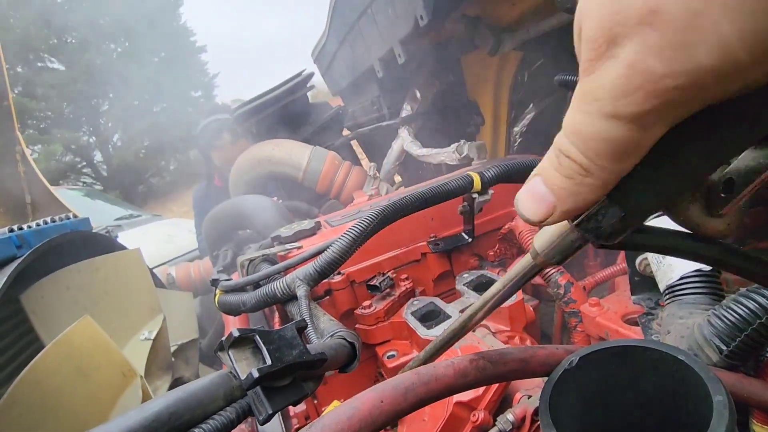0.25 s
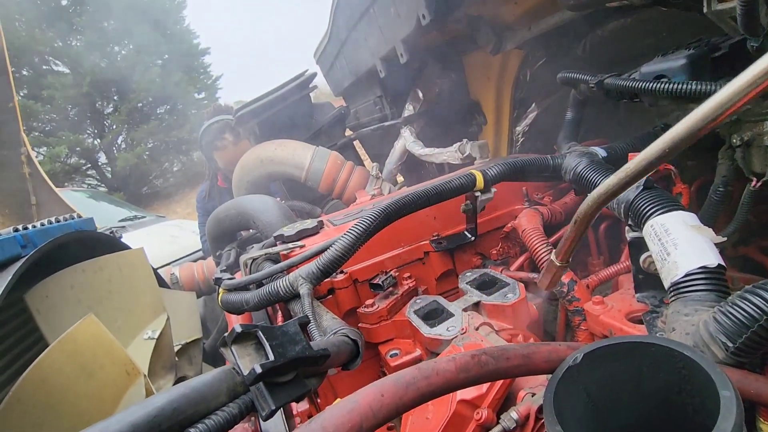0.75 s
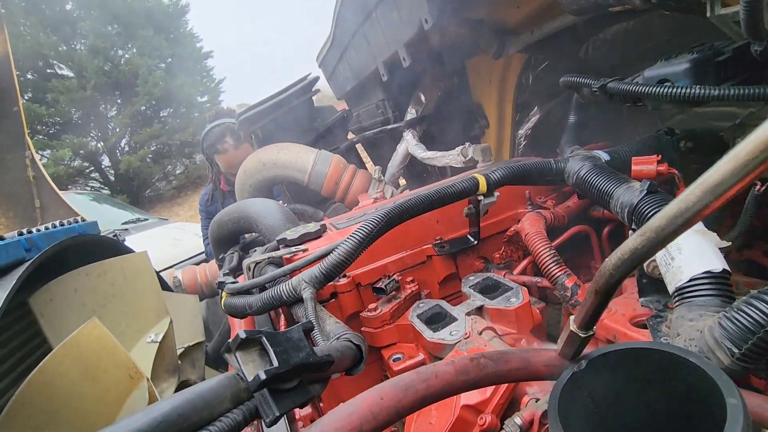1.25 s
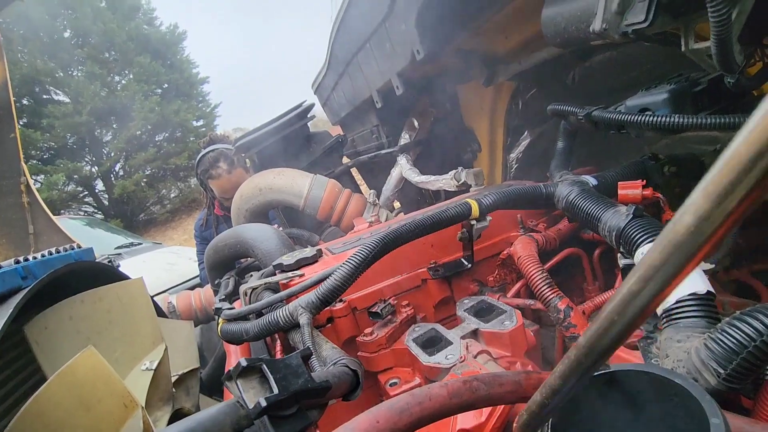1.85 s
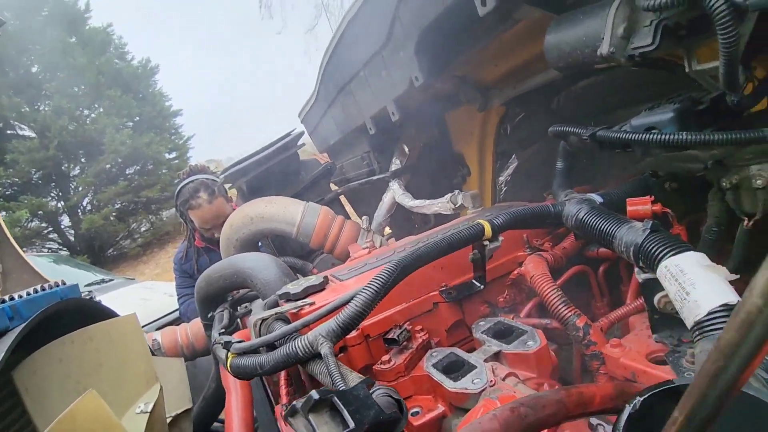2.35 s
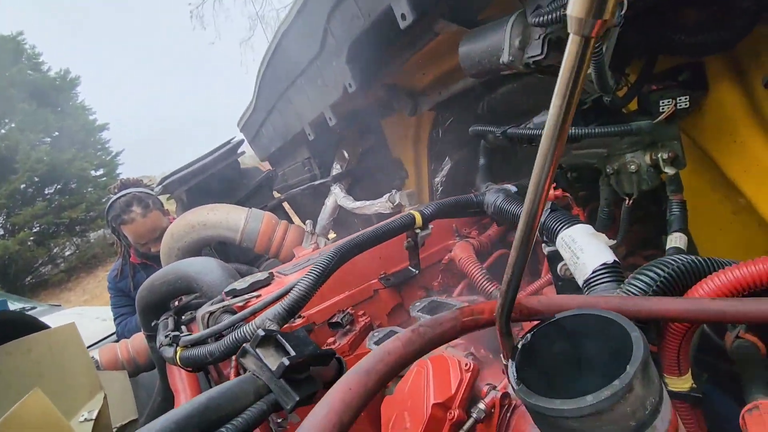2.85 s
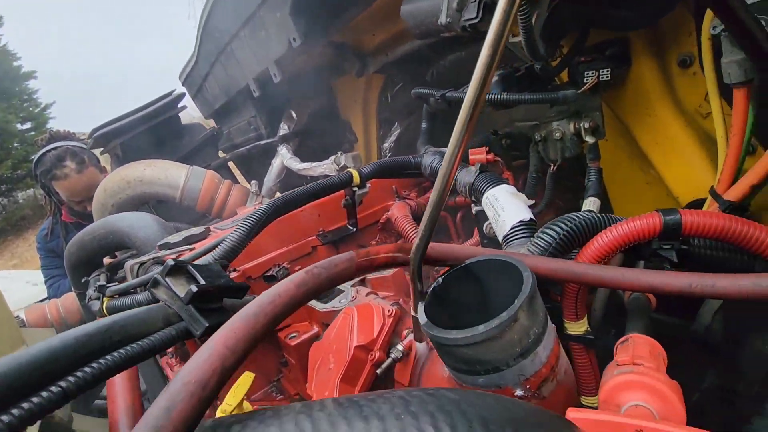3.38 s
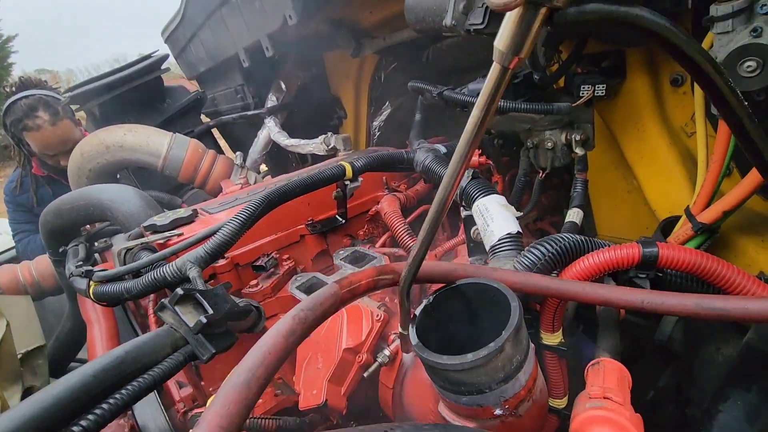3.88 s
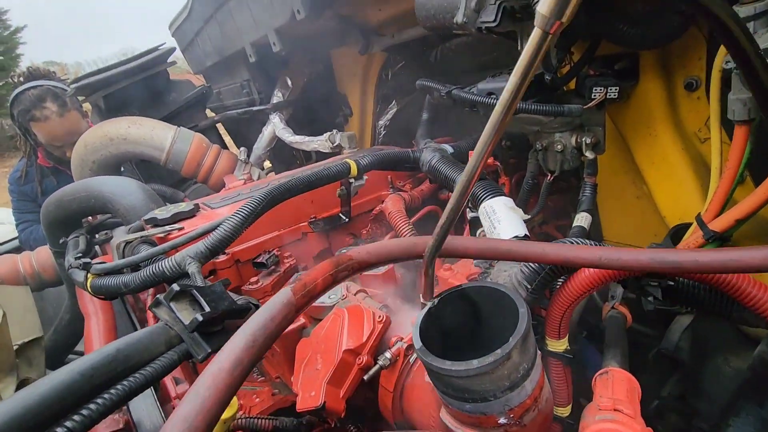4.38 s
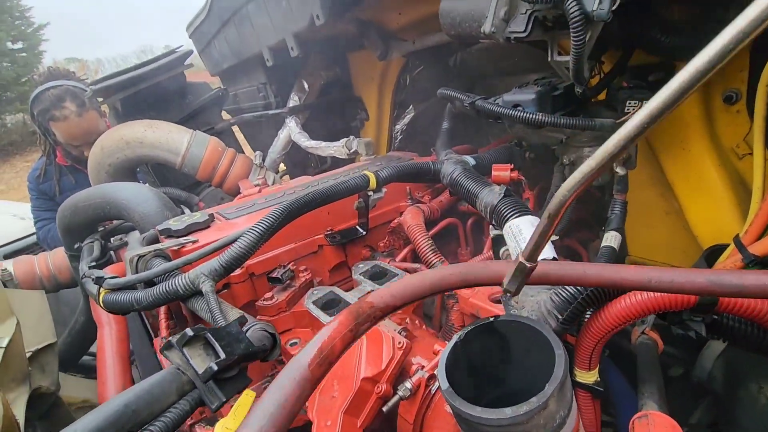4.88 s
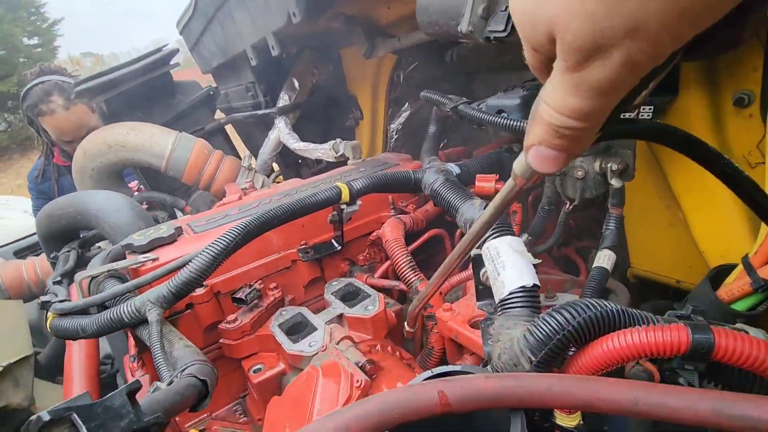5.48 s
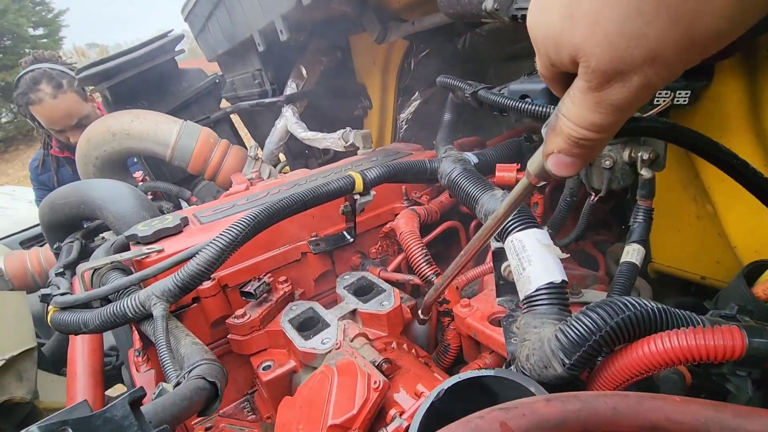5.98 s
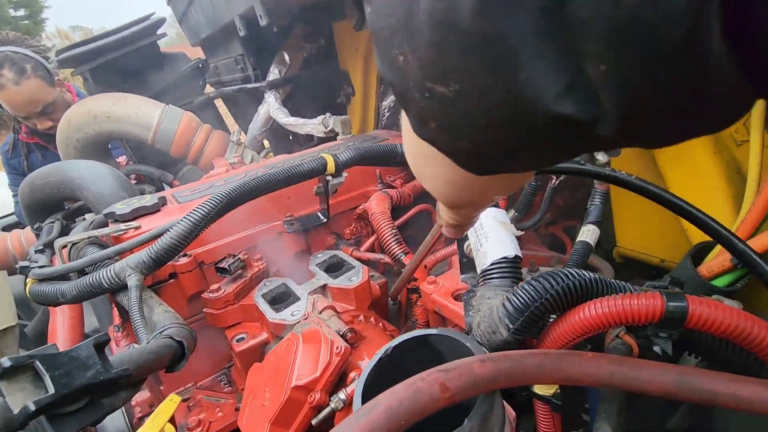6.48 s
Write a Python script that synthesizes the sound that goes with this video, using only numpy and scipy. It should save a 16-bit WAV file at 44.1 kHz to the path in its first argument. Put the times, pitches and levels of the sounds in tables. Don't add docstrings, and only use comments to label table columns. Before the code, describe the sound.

A forceful, bright hiss fills the foreground in three blasts separated by two short gaps. It roughens on sharp edges, dulls behind parts and gives breathy, hollow tones across open ports. The metal wand taps and scrapes softly, clearest in the gaps. Beneath it, a diesel idle throbs steadily in an open yard with faint air noise, heard by a close stereo microphone.

```python
import sys
import numpy as np
from scipy import signal
from scipy.fft import rfft, irfft, next_fast_len
from scipy.io import wavfile
from scipy.ndimage import uniform_filter1d, map_coordinates

SR = 44100
rng = np.random.default_rng(int(sys.argv[2]) if len(sys.argv) > 2 else 0)


def inscribe(sig):
    pcm = np.round(np.clip(np.atleast_2d(sig).T, -1, 1) * 32767)
    wavfile.write(sys.argv[1], SR, pcm.astype(np.int16))


def makeup_ratio(level_db):
    decades = np.asarray(level_db, float) / 20
    return 10 ** decades


N = 297234
FFT_N = next_fast_len(N)
HZ = np.fft.rfftfreq(FFT_N, 1 / SR)
T_S = np.arange(N) / SR

# opens t/s, opening t/s, shut t/s, shutting t/s, full-flow core level/dB
PULLS = [
    (-.5, .2, .29, .06, -29.5),
    (.59, 0.16, 4.7, .1, -24.5),
    (5.489, 0.17, 7.5, .1, -25),
]
# from t/s, to t/s, level/dB
LEAKS = [
    (.26, 0.369, -70.5),
    (0.372, .6, -87),
    (4.678, 5.14, -72.5),
    (5.14, 5.55, -63.5),
]
# enters t/s, sinks t/s, stays t/s, rises t/s, level/dB
SHADOWS = [(.19, 0.053, .1, .05, -8.5), (.895, 0.026, 0.11, 0.046, -3.5), (.895, 0.027, .21, 0.067, -10),
           (1.309, 0.072, 0.018, .1, -1), (1.62, .15, .04, 0.13, -8.5), (2.06, 0.069, 0.039, 0.0392, -1),
           (2.85, 0.082, 0.16, .15, -1.5), (3.97, 0.03, 0.31, .04, -1), (5.77, 0.071, 0.024, .04, 0)]
# t/s, half width t/s, level/dB, sizzle re core level/dB
STRIKES = [(.1, 0.019, 3, 0.5), (.79, 0.069, 3, 3.5), (1.25, 0.1, 5, -2), (1.56, 0.055, 3, -2),
           (1.97, 0.18, 5.5, 0), (2.27, 0.032, 2, 4), (2.4, 0.036, -2, 4.5), (2.54, 0.085, 5.5, 1.5),
           (2.65, 0.074, 1, -3), (2.78, 0.076, 1, -2.5), (2.98, 0.029, 6, -4), (3.14, 0.062, 2.5, 2),
           (3.36, 0.11, 4, 1), (3.5, 0.11, 1, 1.5), (3.6, 0.017, 1, 5), (3.72, 0.027, 3.5, 4.5),
           (3.92, 0.05, 1, 10.5), (4.03, 0.033, -1.5, 1), (4.3, 0.034, 5, 1), (4.4, 0.038, 4.5, 2.5),
           (4.59, .03, 0, -4), (5.73, 0.068, 4, 1.5), (5.89, 0.036, 4, -1), (6.05, 0.14, 0, 3),
           (6.38, .05, 5.5, -2.5), (6.66, 0.1, 4.5, -6)]
# t/s, half width t/s, scouring level/dB
EDGES = [(.1, .025, 13), (.17, .03, 4), (1.94, .04, 6.5), (2.24, .04, 5.5), (2.55, .045, 9),
         (2.73, .04, 4.5), (4.28, .05, 6), (4.6, .025, 2), (5.74, .05, -3), (6.32, .05, 7)]
# t/s, half width t/s, level/dB
CROSSINGS = [(.13, 0.05, 11), (.98, 0.018, 18), (5.93, 0.042, 16), (6.19, 0.068, 18.5), (6.28, 0.031, 15),
             (6.56, .025, 18), (6.685, 0.026, 19.5)]
# t/s, depth among castings level/dB, left re right level/dB
AIM = [(0, 4.5, -1), (.2, 12.5, -2), (.75, -1, 1), (1.5, 0, 2.2), (1.95, -2.5, -.5), (2.4, -1, 1.5),
       (2.75, -1.5, -1.5), (3.0, -4, .7), (3.35, -3, -2.5), (4.0, -1, -1), (4.1, -1.5, -1.5), (5.6, 4, 1),
       (5.75, -0.5, -1), (5.9, 2, 0), (6.25, 11, 1.5), (6.6, 5.5, -2), (6.74, 10.5, .5)]
# t/s, left lead/samples, share alike at both ports/0-1
TIP = [(0, 5, .5), (.7, 12, .8), (1.5, 12, .7), (2.3, 13, .6), (3.2, 6, .55), (4.5, 6, .5), (5.6, 7, .6),
       (6.74, 3, .55)]
# shares of shadow, strike, depth, edge, weak flow [dB/dB]
FOLLOW_SHARES = [(0.88, .3, 1.2, 0.26, -.3), (.65, 0.13, 0.27, 0.82, -0.36), (1.82, 0.97, 0.11, 0.02, .15)]
LAYER_HZ = [1100, 2500, 6400, 12500]
# f/Hz, density level/dB
JET_COLOUR = [(260, -47.5), (450, -11), (578, -19), (690, -16), (1120, -14), (1400, -8.5), (1800, -7.5),
              (2060, -1.5), (2800, -4.5), (4430, -3), (7430, 0), (9680, -6), (11900, -1), (15300, -3)]
# f/Hz, left re right level/dB
EAR_BALANCE = [(400, 7.5), (800, 3), (1500, -15), (3000, 7.5), (6000, -1.5), (10000, 4), (15000, 1)]
# f/Hz, width f/Hz, level/dB
PEAK_MODES = [(840, 180, 6), (5340, 420, 4.5), (6750, 170, 0), (7640, 1070, 5.5), (11670, 900, 2.5),
              (14400, 600, 3.5)]
# f/Hz, width f/Hz, level/dB
PIPE_MODES = [(404, 140, -19.5), (690, 130, -7), (1044, 110, -9), (1530, 160, 0)]
# delay t/ms, sway t/ms, sway rate f/Hz, gain/1
ECHOES = [(0.732, 0.074, 3., 0.26), (1.449, 0.063, 2., 0.39), (2.899, 0.208, 2.5, 0.96),
          (4.698, 0.3036, 1.5, 0.79)]
# t/s, peak level/dB, ring f/Hz, tick (hardness) level/dB, t60 t/s
KNOCKS = [(0.299, -43, 1340, -18, 0.065), (.326, -57, 1500, 13, .012), (0.417, -43, 1920, -5, 0.028),
          (2.507, -32, 800, -33, 0.017), (3.451, -32, 810, -34, 0.02), (4.33, -35.5, 800, -30, 0.018),
          (4.766, -41, 1860, -22, 0.05), (4.79, -47.5, 1890, -7, .08), (5.23, -36.5, 994, -38, 0.059),
          (5.36, -43, 1800, -1, 0.011)]
TUBE_HZ = [620, 850, 1040, 1330, 1880, 2250, 2900, 3600]
# multiple of cam rate/1, rms level/dB
EXHAUST_ORDERS = [(2, -46), (3, -40), (4, -29.5), (5, -44.5), (6, -33.5), (8, -46.5), (9, -48), (13, -52.5),
                  (16, -43.5), (17, -45.5)]
# f/Hz, density level/dB
RUMBLE_COLOUR = [(18, -51.5), (30, -7), (54, -4.5), (75, -6), (103, -8), (171, -10), (205, -14.5),
                 (257, -11), (300, -19), (338, -14), (363, -10.5), (377, -18), (520, -49), (680, -84),
                 (1140, -120)]
# f/Hz, density level/dB
YARD_COLOUR = [(290, -41.5), (500, -11), (594, -12), (676, -14), (793, -16.5), (1030, -19.5), (1720, -20.5),
               (3440, -36.5), (15600, -43.5)]


def curve(table):
    t_s, *columns = np.transpose(table)
    return [np.interp(T_S, t_s, column) for column in columns]


def colour(points):
    hz, db = np.transpose(points)
    return np.interp(np.log(HZ + 1), np.log(np.maximum(hz, 1)), db)


def walk(rate_hz):
    k = int(SR / rate_hz)
    held = np.repeat(rng.standard_normal(N // k + 1), k)
    return 1.272 * uniform_filter1d(uniform_filter1d(held, k), k)[:N]


def noise(db, count):
    return rfft(rng.standard_normal((count, FFT_N))) * makeup_ratio(db)


def band(spectrum, hz, octaves):
    x = np.clip(np.log2((HZ + 1) / hz) / octaves, -1, 1)
    return irfft(spectrum * np.cos(np.pi / 2 * x), FFT_N)[..., :N]


def resonances(modes):
    return [makeup_ratio(db) / (1 + (2 * (HZ - hz) / width_hz) ** 2) for hz, width_hz, db in modes]


def delay(x, samples):
    return map_coordinates(x, [np.arange(N) - samples], order=2, mode="nearest")


def ramp(start_s, length_s):
    return np.clip((T_S - start_s) / max(length_s, .005), 0, 1)


def bumps(rows, column=2):
    return sum(row[column] * np.exp(-((T_S - row[0]) / row[1]) ** 2) for row in rows)


def jet():
    core_db, roar_db, scour_db, sizzle_db, blow_db, pan_db = wand()
    lead, share = curve(TIP)
    layers_db = np.array([roar_db, scour_db, 0 * core_db, sizzle_db])
    layers_db -= np.median(layers_db, axis=1, keepdims=True)
    gain = 1 + sum(g * (1 - 1 / makeup_ratio(db)) for g, (_, _, db) in zip(resonances(PEAK_MODES), PEAK_MODES))
    puffs = noise(colour(JET_COLOUR[:-1]), count=3) * gain
    puffs /= np.std(irfft(puffs[0] * (HZ > 4500) * (HZ < 9000)))
    ear_hz, ear_db = np.transpose(EAR_BALANCE)
    swirl = walk(14.)
    out = 0
    for hz in 350 * 2 ** np.arange(0, 6, .5):
        place = np.interp(np.log(hz), np.log(LAYER_HZ), np.arange(4))
        db = sum(max(1 - abs(place - k), 0) * layer for k, layer in enumerate(layers_db))
        db = db + 1.58 * swirl + 1.02 * walk(9.) + 1.4 * walk(40.)
        alike = np.clip(1.15 * share * (hz / 1500) ** -.3, 0, .95)
        side_db = np.interp(np.log(hz), np.log(ear_hz), ear_db) / 2
        weights = np.sqrt([alike, (1 - alike) * makeup_ratio(2 * side_db), (1 - alike) * makeup_ratio(-2 * side_db)])
        out = out + band(puffs, hz, 0.53) * weights * makeup_ratio(db)
    direct, left, right = out * makeup_ratio(core_db + 1.5)
    pair = np.array([direct + left, delay(direct, lead) + right])
    return echoes(pair) * makeup_ratio(np.array([pan_db, -pan_db]) / 2) + pipe(blow_db)


def wand():
    flow_law_db = 53
    pipe_db, pipe_depth = -29.5, 0.93
    flow = 0
    for on_s, opening_s, off_s, shutting_s, db in PULLS:
        valve = ramp(on_s, opening_s) * (1 - ramp(off_s - shutting_s, shutting_s))
        flow = flow + makeup_ratio(db) * valve ** (flow_law_db / 20)
    for on_s, off_s, db in LEAKS:
        flow = flow + makeup_ratio(db) * (ramp(on_s, 0.074) - ramp(off_s, 0.056))
    shadow = sum(db * (ramp(s, sink_s) - ramp(s + sink_s + stay_s, rise_s))
                 for s, sink_s, stay_s, rise_s, db in SHADOWS)
    strike, edge = bumps(STRIKES), bumps(EDGES)
    depth, pan_db = curve(AIM)
    flow_db = 20 * np.log10(np.abs(flow) + 1e-6)
    weak = np.minimum(flow_db - PULLS[0][-1], 0)
    causes = [shadow, strike, depth, edge, weak]
    roar_db, scour_db, sizzle_db = (np.dot(shares, causes) - shadow - strike for shares in FOLLOW_SHARES)
    sizzle_db = sizzle_db + bumps(STRIKES, column=3)
    core_db = flow_db + shadow + strike
    blow_db = core_db - strike + pipe_db + pipe_depth * depth + bumps(CROSSINGS)
    return core_db, roar_db, scour_db, sizzle_db, blow_db, pan_db


def pipe(blow_db):
    tone = irfft(noise(0, count=1)[0] * sum(resonances(PIPE_MODES)))[:N]
    tone = tone / np.std(tone) * makeup_ratio(blow_db + 2.2 * walk(17.0))
    return np.array([makeup_ratio(-3.0) * tone, makeup_ratio(5.5) * delay(tone, 3.)])


def echoes(pair):
    spread = 0.0411
    out = pair
    for ms, sway_ms, rate_hz, gain in ECHOES:
        path_ms = ms + sway_ms * walk(rate_hz)
        copies = [delay(x, (path_ms + spread * ms * walk(rate_hz)) * SR / 1000) for x in pair]
        out = out + gain * np.array(copies)
    return out / np.sqrt(1 + sum(row[-1] ** 2 for row in ECHOES))


def bandpass(x, lo_hz, hi_hz):
    return signal.sosfilt(signal.butter(4, [lo_hz, hi_hz], "band", fs=SR, output="sos"), x)


def knocks():
    thump_db, thump_per_hard = -16.5, -0.62
    out = np.zeros((2, N + SR))
    t = np.arange(SR // 5) / SR
    for s, db, hz, tick_db, t60_s in KNOCKS:
        fade = np.exp(-np.log(1000) * t / max(t60_s, .005))
        hiss = rng.standard_normal((2, len(t))) * fade
        octaves = np.log2(np.array(TUBE_HZ) / hz)
        reach = makeup_ratio(-7 * octaves ** 2 + 3 * rng.standard_normal(len(TUBE_HZ)))
        ring = reach @ np.sin(2 * np.pi * np.outer(TUBE_HZ, t)) * fade
        scrape = 1.1 * bandpass(hiss, 0.39 * hz, 1.7 * hz)
        tick = 2.2 * makeup_ratio(tick_db) * bandpass(hiss, 6200, 8200)
        thump = 6 * makeup_ratio(thump_db + thump_per_hard * tick_db) * bandpass(hiss[0], 210, 830)
        start = int(s * SR)
        out[:, start:start + len(t)] += (0.61 * ring + scrape + tick + thump) * makeup_ratio(db)
    return out[:, :N]


def engine():
    cam_hz, rumble_db = 20.6, -32
    speed_hz = cam_hz * (1 + 0.00184 * walk(2.124) + 0.0043 * walk(20.))
    turn = 2 * np.pi * np.cumsum(speed_hz) / SR
    tones = sum(np.sqrt(2) * makeup_ratio(db + 1.7 * walk(8.)) * np.sin(k * turn + 2 * np.pi * rng.random())
                for k, db in EXHAUST_ORDERS)
    air = noise(colour(RUMBLE_COLOUR), count=2) / (1 + (36 / (HZ + 1)) ** 8)
    alike = np.clip(0.89 / (1 + (HZ / 1000) ** 2), 0, 1)
    mid, side = irfft(air * np.sqrt([1 + alike, 1 - alike]))[:, :N]
    throb = makeup_ratio(rumble_db) / np.std(mid) * (1 + 0.51 * np.cos(2 * turn))
    left = delay(tones + throb * (mid + side), 6.)
    right = tones + throb * (mid - side)
    return makeup_ratio(np.array([[.5], [-.5]])) * np.array([left, right])


def yard():
    both, left, right = noise(colour(YARD_COLOUR), count=3)
    alike = 1 / (1 + (HZ / 700) ** 4)
    air = irfft(np.sqrt(alike) * both + np.sqrt(1 - alike) * np.array([left, right]))[:, :N]
    return air * makeup_ratio(-53 + 1.6 * walk(0.97)) / np.std(air)


def scene():
    return jet() + knocks() + engine() + yard()


def low_pass(x):
    return signal.sosfilt(signal.butter(12, 15520, fs=SR, output="sos"), x)


def record(dry):
    soft = np.tanh(0.69 * dry) / 0.71
    return low_pass(soft)


dry = scene()
out = record(dry)
inscribe(out)
```